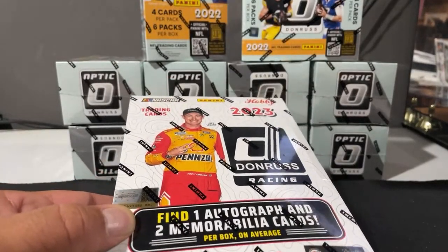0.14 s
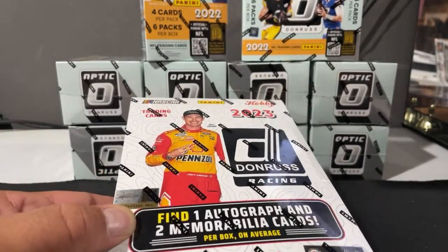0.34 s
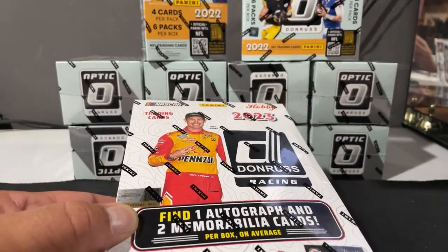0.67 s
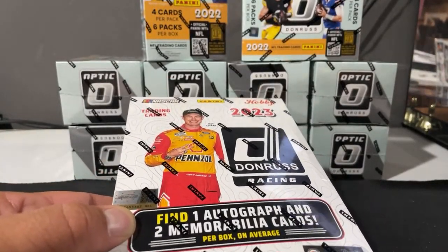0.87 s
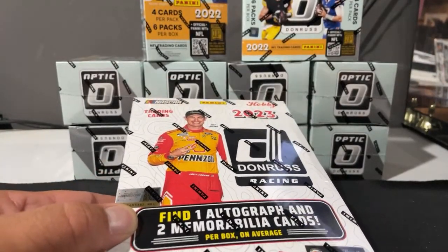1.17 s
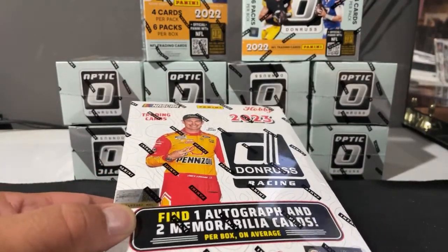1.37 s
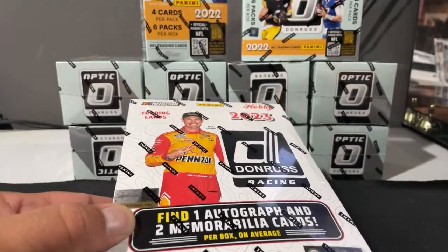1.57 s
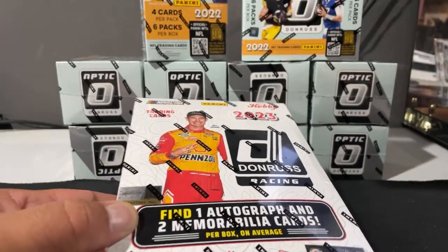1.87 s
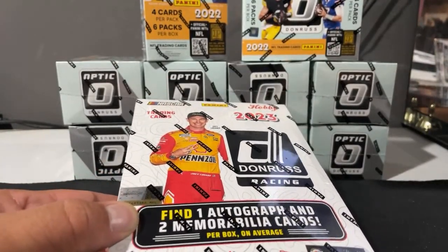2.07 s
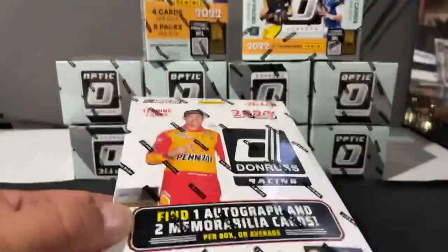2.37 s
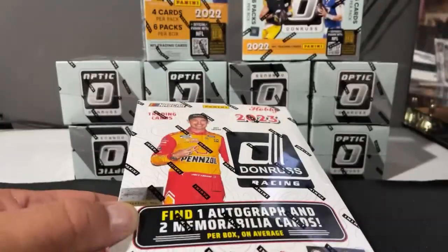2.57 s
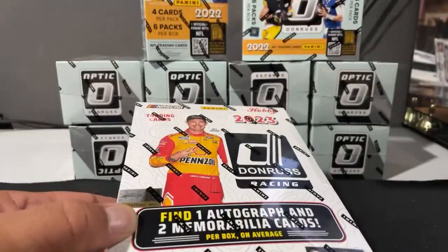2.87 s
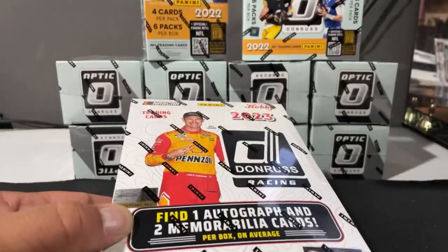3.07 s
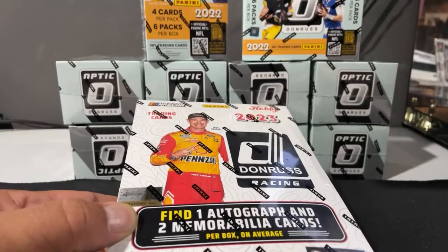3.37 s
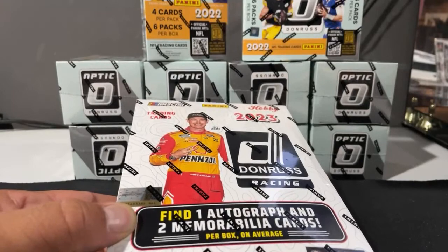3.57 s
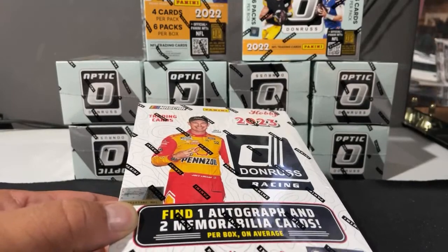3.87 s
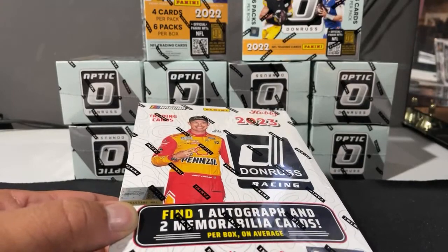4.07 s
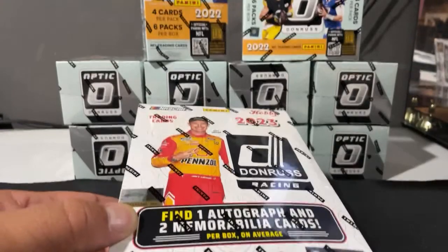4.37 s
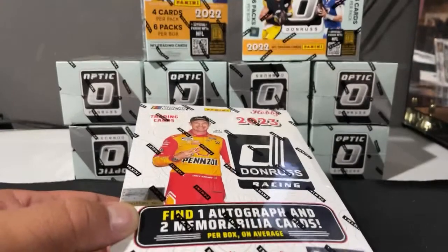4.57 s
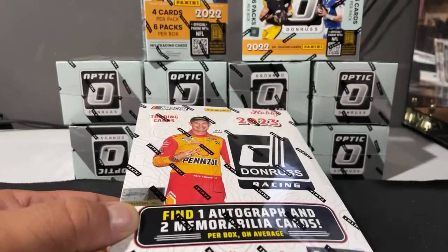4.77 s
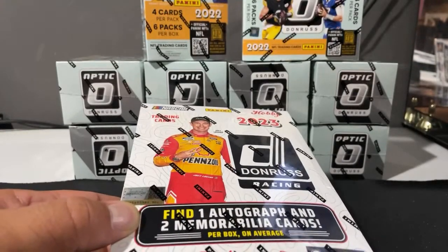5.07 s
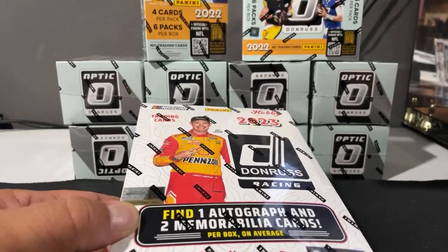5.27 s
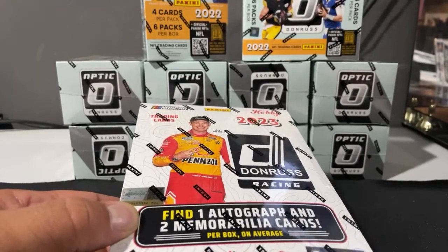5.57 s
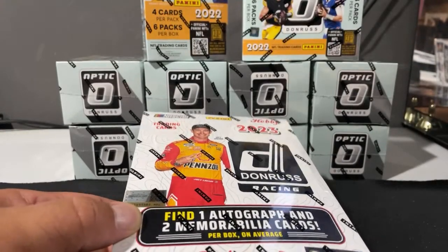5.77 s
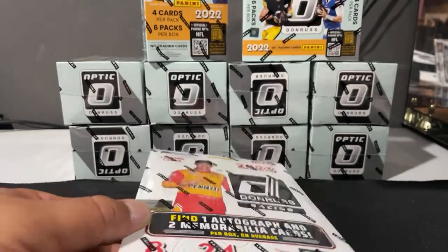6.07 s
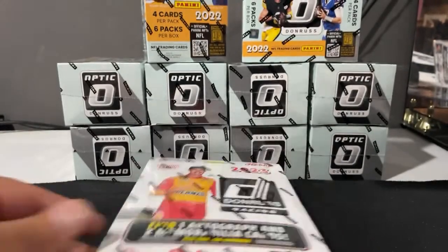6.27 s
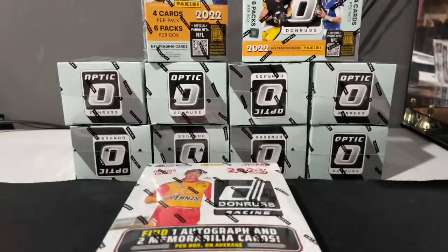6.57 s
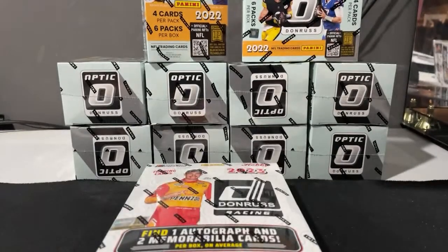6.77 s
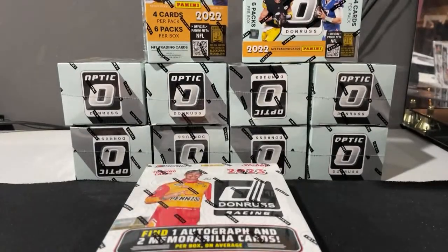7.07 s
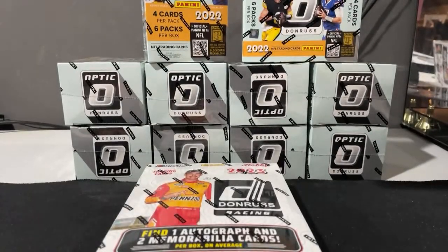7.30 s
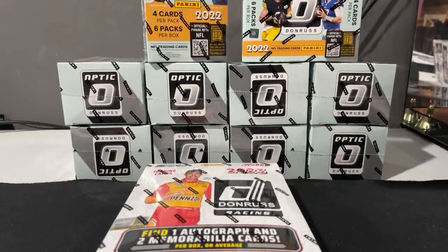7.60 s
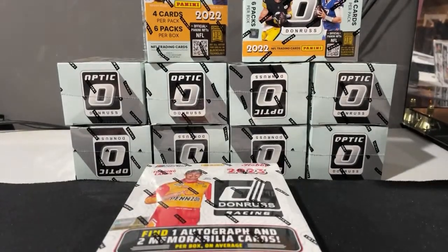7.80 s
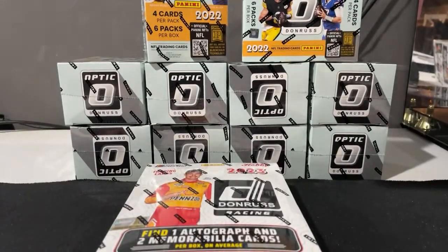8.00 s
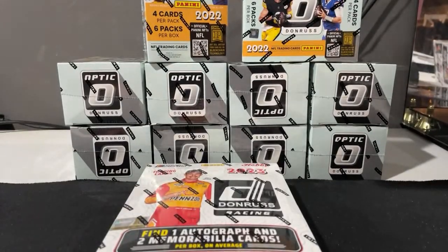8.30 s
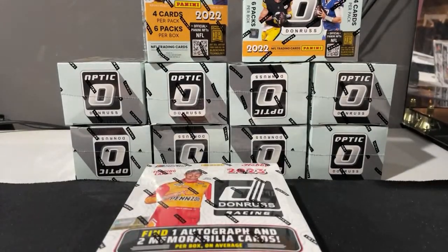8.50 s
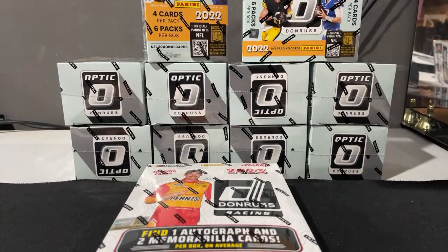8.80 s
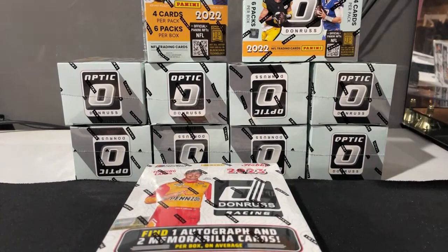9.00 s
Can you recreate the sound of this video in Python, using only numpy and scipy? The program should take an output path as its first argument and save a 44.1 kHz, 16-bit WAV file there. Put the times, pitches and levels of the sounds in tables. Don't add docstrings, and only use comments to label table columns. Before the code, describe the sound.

Close to a phone in a small, quiet room, fingers tap and scuff lightly around a box. A very loud, sharp slap hits the desk at about two seconds, followed by rubbing and softer bumps. A strong double thump comes just after four seconds, a medium one near five and a half, then weaker knocks and sparse handling to the end.

```python
import sys
import numpy as np
from scipy import signal
from scipy.fft import rfft, irfft, next_fast_len
from scipy.io import wavfile
from scipy.ndimage import uniform_filter1d

SR = 44100
rng = np.random.default_rng(int(sys.argv[2]) if len(sys.argv) > 2 else 0)


def generate_wav(signal):
    frames = np.transpose(np.atleast_2d(signal))
    scaled = np.clip(frames, -1, 1) * 32767
    pcm = np.round(scaled).astype(np.int16)
    wavfile.write(sys.argv[1], SR, pcm)


def voltage_ratio(decibels):
    exponent = np.asarray(decibels, float) / 20
    return 10 ** exponent


N = 403382

# start in seconds, peak in dB, loudest mode in Hz,
# ring t60 in seconds, hardness in dB per octave.
SLAP_BLOWS = [(1.667, -20, 183.4, 0.16, -3.5), (2.273, 0.5, 142, 0.14, 0.5), (2.371, -14, 490, 0.055, 2.5),
              (3.011, -22, 191, 0.17, -8), (3.11, -19.5, 195.8, 0.3, -0.5), (3.169, -18, 167, 0.19, -1),
              (4.206, -5, 341.3, 0.032, -2), (4.218, -3.5, 157.8, 0.12, -2.5), (4.412, -5, 139, 0.16, -0.5),
              (5.377, -12, 294.7, 0.11, -3.5), (5.396, -9.5, 436, 0.051, -2),
              (5.424, -15.5, 124.3, 0.17, 0.5), (6.075, -25, 149, 0.19, -5.5),
              (6.361, -16.5, 285, 0.05, -1), (6.368, -14, 76.3, 0.1, -4.5),
              (7.634, -23.5, 317, 0.079, -1.5), (7.931, -17, 232.6, 0.084, -4.5),
              (7.974, -23.5, 144.6, 0.18, 2.5)]
# start in seconds, peak in dB,
# loudest mode in Hz, hardness in dB per octave.
NUDGES = [(0.067, -44, 386, 11), (.489, -38.5, 245, 11), (1.051, -31, 110, -3), (1.074, -29, 99, 4.5),
          (1.78, -34, 286, 3.5), (2.657, -32, 350, -0.5), (2.757, -24.5, 156.6, 3.5),
          (2.823, -27.5, 191, 4), (3.082, -25.5, 189, 4), (3.214, -21, 147, -2.5), (3.488, -28, 139, 4.5),
          (3.522, -20.5, 156.5, 4), (3.756, -32, 189.7, -1), (4.29, -15.5, 188, 5), (4.803, -36.5, 151, 1),
          (4.861, -29, 111.6, 3.5), (5.168, -36, 140, 4.5), (5.715, -37, 152, -1.5), (6.153, -35, 140, 2),
          (7.269, -32, 141.7, 3.5), (7.428, -30.5, 273, 2), (7.655, -27, 186.3, 0), (7.832, -34, 292, -4.5),
          (8.47, -36.5, 245, -3), (8.561, -30, 245, -1)]
SLAP_CONTACT_S, NUDGE_CONTACT_S, NUDGE_T60_S = 0.0092, 0.014, 0.0784
# frequency in Hz, level in dB, share of the ring time.
BOARD_MODES = [(67.1, -9, 2.3), (112, -6.5, 1.6), (150.5, 6, 0.42), (191, -7.5, 1), (245, -4.5, 0.65),
               (288.8, -1, 1), (354, 0.5, 0.45), (477.5, -2.5, 0.52), (574, -12, 0.48), (773, -10.5, 0.52)]
BOOM_T60_S, BOOM_DB = 0.24, -15

# start in seconds, peak in dB, knock in Hz,
# crack over knock in dB, clatter t60 in seconds.
KNOCKS = [(1.035, -29.5, 500, -13, 0.14), (2.096, -33, 782, -10.5, 0.083), (2.256, -32, 3090, 0.5, 0.05),
          (2.272, -2.5, 765, -0.5, 0.089), (2.335, -22.5, 1190, 0.5, 0.019),
          (2.371, -12, 475.4, -13, 0.034), (2.518, -33.5, 2250, -1, 0.13), (2.754, -34, 1670, -3, 0.13),
          (3.007, -27.5, 473, -6.5, 0.043), (3.098, -18, 1500, -19, 0.06), (3.337, -27.5, 1930, -6, 0.16),
          (3.757, -39, 715, -32, 0.069), (4.204, -8.5, 583, -7.5, 0.029), (4.213, -11.5, 402, -9.5, 0.089),
          (4.236, -21.5, 490, 2, 0.019), (4.401, -30, 452, -9, 0.1), (4.413, -9, 492, -8, 0.047),
          (5.374, -12, 474, -6.5, 0.063), (5.4, -11.5, 452, -4.5, 0.03), (6.073, -28, 410, -11, 0.13),
          (6.362, -19.5, 593, -13, 0.086), (7.643, -28.5, 550, -13.5, 0.12), (7.93, -19.5, 972, -10, 0.12),
          (7.976, -29.5, 960, -21, 0.13)]
# start in seconds, peak in dB, knock in Hz, crack over knock in dB.
TAPS = [(0.491, -42, 540, -25), (0.71, -33, 460, -10), (4.436, -22, 1504, -8), (1.138, -43, 2090, -2.5),
        (1.217, -41, 1100, -5.5), (1.658, -32, 470, -14.5), (1.833, -42, 990, -2.5), (1.889, -39, 1420, -5),
        (2.185, -45, 1310, -3.5), (2.823, -32.5, 1090, -9), (2.889, -28.5, 1094, -28),
        (3.199, -34.5, 1740, -25), (3.279, -34.5, 720, -30), (3.58, -34.5, 617, -12),
        (3.684, -39, 1450, -31), (4.155, -46.5, 1440, -2.5), (4.659, -50, 1725, -2.5),
        (4.848, -42.5, 490, -2), (5.55, -43, 1750, -12), (5.576, -44.5, 1730, -3), (5.683, -47, 1770, -7.5),
        (5.756, -46, 1272, -14.5), (5.889, -62, 4520, 8), (6.339, -43, 1110, -7), (6.82, -34, 420, -22.5),
        (7.428, -39, 980, -22.5), (7.529, -45, 414, -17), (7.834, -33.5, 507, -31),
        (8.05, -39.5, 1350, -6.5), (8.584, -32, 303, -29)]
TAP_T60_S = 0.071
# frequency in Hz, level in dB per Hz.
KNOCK_COLOUR = [(210, -30), (350, 7), (474, -5.5), (1500, -9.5), (2100, -19), (3400, -25), (11000, -38.5),
                (16000, -41)]

# start in seconds, level in dB, t60 in seconds.
CHINKS = [
    (1.676, -66, .25),
    (1.9, -69, .12),
    (1.995, -63, .15),
    (2.075, -69, .1),
    (2.57, -66, .15),
    (2.637, -63, .16),
    (2.767, -63, .14),
]
# frequency in Hz, level in dB.
METAL_MODES = [(13120, 0), (15560, -10), (8600, -15)]

# start in seconds, length in seconds, centre in Hz, width in Hz, peak in dB.
RESONANT_BURSTS = [(3.105, 0.17, 190, 23, -20.5), (6.362, .034, 117, 47, -7), (3.079, 0.17, 445, 120, -31),
                   (4.235, 0.17, 380, 260, -24.5), (0.46, 0.077, 4040, 500, -57), (3.092, 0.024, 7000, 1500, -41),
                   (3.132, .02, 7000, 1000, -48), (3.18, 0.075, 3800, 700, -48), (3.175, .025, 7200, 1200, -44.5),
                   (3.176, .03, 3000, 500, -41), (3.219, 0.028, 7000, 1400, -50), (2.9, 0.025, 2800, 500, -47),
                   (3.218, 0.025, 1690, 400, -40), (3.333, 0.062, 2350, 650, -34.5),
                   (3.387, 0.11, 2600, 970, -46.5), (1.125, 0.07, 125, 30, -39), (3.661, .02, 1300, 900, -47),
                   (4.184, 0.018, 2220, 2000, -42), (4.204, .007, 3330, 600, -19), (4.258, 0.1, 3300, 400, -47),
                   (4.351, 0.1, 2900, 500, -46), (4.407, 0.022, 6900, 760, -31), (4.408, 0.063, 2750, 440, -22.5),
                   (4.535, .07, 14100, 300, -59.5), (4.581, 0.037, 4950, 5400, -50), (4.65, 0.12, 8240, 504, -60.5),
                   (4.66, 0.096, 4730, 600, -60), (4.655, 0.11, 14960, 1507, -60.5),
                   (4.212, 0.004, 3800, 7000, -21.5), (4.9, .04, 4470, 496, -52.5), (5.577, .03, 8600, 2000, -56),
                   (5.572, .03, 5630, 500, -59.5), (8.582, 0.013, 1015, 500, -46), (5.66, 0.035, 5900, 502, -56.5),
                   (5.747, 0.078, 4350, 250, -57.5), (5.75, 0.033, 6940, 3030, -53),
                   (5.842, 0.0033, 5000, 7000, -56), (5.889, 0.03, 10400, 4300, -50),
                   (6.362, 0.0065, 6300, 3500, -32), (6.373, 0.011, 1130, 900, -24),
                   (6.374, 0.017, 2770, 1800, -31), (6.375, 0.0055, 5900, 4000, -35), (6.4, 0.017, 3650, 300, -53),
            (7.593, 0.085, 2210, 1100, -48.5), (7.601, 0.039, 4460, 500, -54.5),
            (7.637, 0.037, 5000, 5000, -51), (7.829, 0.046, 3000, 3000, -60.5),
            (7.876, 0.051, 4000, 4500, -41), (7.93, .025, 10100, 1500, -37), (7.93, .03, 14800, 1800, -48),
            (7.975, .02, 5400, 600, -52), (8.046, 0.09, 3780, 3000, -49.5), (8.112, 0.022, 3500, 400, -62),
            (4.416, 0.045, 498, 50, -17.5), (2.276, .045, 345, 59.73, -10.5),
            (8.479, 0.13, 3570, 796, -63.5), (8.524, 0.1, 1695, 1200, -51.5),
                   (0.773, .03, 5220, 1000, -38), (0.777, 0.03, 3440, 760, -36.5), (0.896, 0.0051, 3560, 4500, -37.5),
         (0.957, .012, 4970, 4000, -49), (1.039, 0.12, 251.3, 210, -37), (1.195, .008, 2250, 2900, -46),
         (1.585, .008, 3980, 6000, -52), (1.656, 0.017, 375, 240, -28), (1.7, 0.11, 167.7, 41, -32),
         (2.02, 0.03, 1220, 1800, -44), (2.106, .04, 3040, 3200, -49), (2.27, 0.0041, 3604, 3000, -9.5),
         (2.278, 0.0067, 3510, 1700, -9), (2.369, 0.0042, 4620, 9200, -22.5),
         (3.099, 0.016, 1448, 400, -19.5), (3.68, 0.019, 1490, 370, -35.5), (3.708, .03, 12100, 6000, -48),
         (3.754, .03, 1300, 1300, -51), (3.835, 0.056, 1403, 1280, -49), (3.883, 0.05, 3280, 1300, -52),
         (4.035, 0.032, 5460, 2000, -48.5), (4.156, .015, 6270, 440, -54.5),
         (5.396, 0.011, 4230, 500, -22.5), (5.4, 0.024, 434, 180, -11), (6.081, 0.0072, 4500, 6000, -39),
         (6.093, .005, 3450, 4000, -43), (6.113, .005, 4570, 2700, -37), (6.862, .012, 8000, 12300, -52),
         (8.289, 0.17, 1199, 1400, -60), (8.823, 0.15, 1505, 1200, -54), (4.428, 0.15, 79.7, 18, -17.5),
         (2.33, 0.16, 75, 22, -24), (4.25, 0.28, 190.6, 90, -21.5)]
RATTLE_RISE_S, RATTLE_FALL = 0.0022, 0.5

# start in seconds, length in seconds, skin in dB, hiss in dB,
# hollow under the hand in Hz.
DRAGS = [(0.673, 0.17, -39, -58.5, 483), (0.918, 0.064, -35, -64, 1147), (1.125, 0.11, -42, -66, 1056),
         (2.076, 0.074, -40.5, -55, 825), (2.508, 0.013, -22.5, -48, 2180), (2.745, 0.11, -34, -52.5, 1517),
         (2.839, 0.037, -30, -43.5, 1650), (2.885, 0.1, -40, -51, 1084), (2.988, 0.021, -33.5, -66, 505),
         (3.177, 0.046, -32, -55, 1767), (3.328, 0.048, -27, -46.5, 1970), (3.387, 0.12, -40, -77, 1110),
         (3.504, 0.024, -39, -79, 670), (3.57, 0.045, -40, -80, 720), (3.955, 0.095, -38.5, -83, 992),
         (4.023, 0.041, -37, -54, 1320), (4.807, 0.037, -41, -66.5, 1690), (8.121, 0.033, -44, -72.5, 570),
         (5.754, 0.034, -45, -68, 1310), (6.071, 0.066, -34, -67, 1175), (7.418, 0.068, -43, -64, 1610),
         (7.834, .04, -45.5, -72.5, 507), (7.92, 0.091, -30, -49, 980), (8.468, 0.15, -51.5, -78, 790)]
# start in seconds, length in seconds, skin in dB, hiss in dB,
# hollow in Hz.
SCUFFS = [(0.757, 0.028, -39, -44, 3020), (2.335, 0.051, -25, -36.5, 3020),
          (2.537, 0.018, -31, -42.5, 2890), (3.072, 0.1, -42, -46, 1340), (4.214, 0.048, -19.5, -38, 2890),
          (4.399, 0.058, -18.5, -31.5, 1516), (4.644, 0.079, -60.5, -66.5, 1733),
          (4.887, 0.051, -45, -50.5, 1790), (5.142, 0.15, -39.5, -50, 1785), (5.387, 0.012, -51, -21, 1240),
          (5.569, 0.016, -45.5, -48, 1800), (6.115, 0.12, -49, -49, 2170), (6.594, 0.17, -43, -48, 1290),
          (7.208, 0.11, -60.5, -65.5, 1400), (7.615, 0.049, -44.5, -58, 2170),
          (7.866, 0.043, -31, -62, 1325), (8.039, 0.062, -42, -71, 1400)]
DRAG_FIBRE_HZ, SCUFF_FIBRE_HZ = 8030, 3450
# frequency in Hz, level in dB per Hz.
CLOTH_COLOUR = [(180, -24), (400, 3.5), (749, -3.5), (1230, -2.5), (2480, -13.5), (7690, -24), (12500, -24),
                (16000, -26)]

# start in seconds, length in seconds, first pitch in Hz,
# last pitch in Hz, width in Hz, level in dB.
SQUEAKS = [
    (0.02, 0.45, 1100, 1150, 270, -62),
    (3.376, 0.11, 1085, 1075, 60, -52),
    (6.5, 0.03, 1480, 1620, 30, -57),
    (6.622, 0.072, 2430, 2540, 60, -48),
    (3.975, 0.083, 290, 270, 52, -43.5),
]

# start in seconds, length in seconds, skin on wood in dB,
# cloth hiss in dB.
SPELLS = [(0.33, 0.063, -77, -71), (0.398, 0.79, -62, -64), (1.237, 1, -63, -67.5),
          (2.251, 0.4, -53.5, -61), (2.742, 0.68, -57, -59.5), (3.448, 0.23, -64, -68),
          (3.667, 0.3, -75, -68), (3.974, 0.31, -71.5, -75), (4.196, 0.29, -48, -63.5),
          (4.412, 0.13, -47.5, -46.5), (4.828, 0.083, -64, -67), (5.127, 0.2, -62.5, -66),
          (5.392, 0.12, -56, -54), (5.572, 0.24, -70, -72), (5.83, 0.34, -84, -67), (6.06, 0.79, -66, -58),
          (6.606, 0.08, -81, -45.5), (6.846, 0.53, -71, -80.5), (7.188, 0.089, -60, -70),
          (7.43, 0.35, -62.5, -70.5), (7.836, 0.23, -66.5, -75), (8.215, 0.36, -77, -88.5),
          (8.816, 0.51, -93, -70), (8.925, 0.21, -99.5, -67)]
SPELL_RISE_S, SPELL_FALL_S = 0.017, 0.04
STILL_RUMBLE_DB, STILL_SKIN_DB, STILL_CLOTH_DB = -60, -74, -83.5
LEAN_DB, SHAKE_DB, SHAKE_T60_S = 8, -17.5, 0.46
# frequency in Hz, level in dB per Hz.
RUMBLE_COLOUR = [(25, -37), (48, -38), (65, 0), (156, -1), (394, -12.5), (500, -26.5), (650, -62.5),
                 (1100, -120)]

# start in seconds, length in seconds, level in dB.
SWISHES = [
    (3.674, 0.22, -59),
    (6.11, 0.55, -58.5),
    (7.934, 0.054, -60),
]
PATCHY_DB = 2.1

ROOM_T60_S, ROOM_DB, ROOM_HZ = 0.2, -17, 5058
HUSH_DB, HUSH_DEPTH = -112, .55
TOP_HZ = 15850


def shaped(x, table, lo_hz=20., hi_hz=18930.0):
    n = next_fast_len(len(x))
    hz = np.fft.rfftfreq(n, 1 / SR) + 1
    table_hz, table_db = np.transpose(table)
    gain = voltage_ratio(np.interp(np.log(hz), np.log(table_hz), table_db))
    edges = 1 / np.sqrt((1 + (lo_hz / hz) ** 6) * (1 + (hz / hi_hz) ** 6))
    return irfft(rfft(x, n) * gain * edges, n)[:len(x)]


def unit(x):
    return x / np.sqrt(np.mean(x ** 2))


def decay(t, t60):
    return np.exp(-np.log(1000) * t / t60)


def ring(t, hz, t60):
    return np.sin(2 * np.pi * hz * t) * decay(t, t60)


def add(out, s, x, db):
    i = int(s * SR)
    out[i:i + len(x)] += (voltage_ratio(db) * x / np.max(np.abs(x)))[:N - i]


def grainy(rate, spread_db):
    k = int(SR / rate)
    grain_db = spread_db * np.minimum(rng.exponential(size=N // 20 + 1), 2.5)
    size = voltage_ratio(grain_db)[np.arange(N) // k]
    return rng.standard_normal(N) * uniform_filter1d(size, k)


def spell(s, length):
    now = np.arange(N) / SR
    return (1 + np.tanh((now - s) / SPELL_RISE_S)) * (1 - np.tanh((now - s - length) / SPELL_FALL_S)) / 4


def thumps():
    out = np.zeros(N)
    t = np.arange(0, SR // 2, 8) / SR
    blows = [row + (SLAP_CONTACT_S,) for row in SLAP_BLOWS]
    blows += [(s, db, hz, NUDGE_T60_S, hard_db, NUDGE_CONTACT_S) for s, db, hz, hard_db in NUDGES]
    chance = rng.standard_normal((len(blows), 4, 11))
    for (s, db, hz, t60, hard_db, contact), g in zip(blows, chance):
        body = 0
        for k, (f, mode_db, share) in enumerate(BOARD_MODES + [(hz, 4, .9)]):
            octaves = np.log2(f / hz)
            size = voltage_ratio(mode_db + 0.91 * g[0, k] - 4.4 * abs(octaves) + hard_db * octaves)
            rise = (1 - np.exp(-t / (contact * (150 / f) ** 0.16))) ** 2
            phase = 2 * np.pi * f * (1 + .015 * g[1, k]) * t + 3 * g[2, k]
            top = decay(t, t60 * share) * np.sin(phase)
            frame = decay(t, BOOM_T60_S * (150 / f) ** 0.62) * np.sin(phase * (1 + 0.056 * g[3, k]))
            body = body + size * rise * (top + voltage_ratio(BOOM_DB) * frame)
        add(out, s - .003, signal.resample_poly(body, up=8, down=1), db)
    return out


def knocks():
    out, t = np.zeros(N), np.arange(SR // 4) / SR
    broad = unit(shaped(grainy(700, 3.9), KNOCK_COLOUR, lo_hz=365.0, hi_hz=3080.0))
    crack = unit(shaped(grainy(700, 3), KNOCK_COLOUR, lo_hz=2700., hi_hz=17000.))
    for s, db, hz, crack_db, t60 in KNOCKS + [row + (TAP_T60_S,) for row in TAPS]:
        i = min(int(s * SR), N - len(t))
        t60 = min(t60, .12)
        clatter = (1 - np.exp(-t / 0.0034)) * decay(t, t60)
        pair = ring(t, hz, min(.7 * t60, .04)) + .7 * ring(t, .885 * hz, min(.6 * t60, .04))
        pitched = (1 - np.exp(-t / .002)) * pair
        dull = (600 / max(hz, 600)) ** 0.29 * unit(broad[i:i + len(t)] * clatter)
        add(out, s - .001, dull + .9 * unit(pitched), db)
        bright = crack[i:i + len(t)]
        patch = sum(ring(t[:512], f, 0.0043) for f in 2600 * 3 ** rng.random(size=3))
        bright = bright + 0.51 * unit(signal.fftconvolve(bright, patch)[:len(t)])
        add(out, s - .001, bright * clatter ** 0.92, db + crack_db)
    return out


def chinks():
    shake, t = np.zeros(N), np.arange(SR // 4) / SR
    for s, db, t60 in CHINKS:
        add(shake, s, (1 - np.exp(-t / 0.011)) * decay(t, t60), db)
    modes = sum(voltage_ratio(db) * ring(t[:2048], hz, 0.024) for hz, db in METAL_MODES)
    return signal.fftconvolve(shake * grainy(110, 6.8), modes / np.sqrt(np.sum(modes ** 2)))[:N]


def rattles():
    out, rows = np.zeros(N), RESONANT_BURSTS
    for (s, length, hz, width_hz, db), z in zip(rows, rng.standard_normal((len(rows), 2, SR // 4))):
        t = np.arange(int(min(length, .24) * SR)) / SR
        k = int(SR / width_hz / 1.5) + 1
        a, b = uniform_filter1d(uniform_filter1d(z, k), k)[:, :len(t)]
        buzz = a * np.cos(2 * np.pi * hz * t) + b * np.sin(2 * np.pi * hz * t)
        add(out, s, buzz * (1 - np.exp(-t / RATTLE_RISE_S)) * (1 - t / t[-1]) ** RATTLE_FALL, db)
    return out


def scuffs():
    out, t = np.zeros(N + SR), np.arange(SR // 2) / SR
    skin = unit(shaped(grainy(250, 0.65), CLOTH_COLOUR, lo_hz=411.0, hi_hz=2310.0))
    hiss = unit(shaped(grainy(300, 3.8), CLOTH_COLOUR, lo_hz=2070.0))
    rows = [row + (DRAG_FIBRE_HZ,) for row in DRAGS] + [row + (SCUFF_FIBRE_HZ,) for row in SCUFFS]
    for s, length, skin_db, hiss_db, hollow_hz, fibre_hz in rows:
        i = int(s * SR)
        j = min(i, N - len(t))
        low, high = skin[j:j + len(t)], hiss[j:j + len(t)]
        start = 1 - np.exp(-t / (0.0041 + 0.033 * length))
        hold = start / (1 + np.exp((t - length) / (0.0092 + 0.058 * length)))
        hollow = unit(signal.fftconvolve(low + .5 * high, ring(t[:1024], hollow_hz, 0.11))[:len(t)])
        fibre = unit(signal.fftconvolve(high, ring(t[:1024], fibre_hz, 0.013))[:len(t)])
        dull = voltage_ratio(skin_db - 10.5) * (low + 0.42 * hollow)
        bright = voltage_ratio(hiss_db) * (high + 0.022 * fibre)
        out[i:i + len(t)] += hold * (dull + bright)
    return out[:N]


def squeaks():
    out = np.zeros(N)
    chance = rng.standard_normal((len(SQUEAKS), SR // 2))
    for (s, length, hz0, hz1, width_hz, db), z in zip(SQUEAKS, chance):
        n = int(length * SR)
        stutter = uniform_filter1d(z, int(SR / width_hz))[:n]
        tone = np.sin(2 * np.pi * np.cumsum(np.linspace(hz0, hz1, n)) / SR)
        add(out, s, tone * stutter * np.hanning(n) ** 0.034, db + 10.5)
    return out


def rubbing(thuds):
    mid, high = voltage_ratio(STILL_SKIN_DB), voltage_ratio(STILL_CLOTH_DB)
    for s, length, skin_db, cloth_db in SPELLS:
        on = spell(s, length)
        mid = mid + voltage_ratio(skin_db) * on
        high = high + voltage_ratio(cloth_db) * on
    keep = np.exp(-2 * np.log(1000) / (SHAKE_T60_S * SR))
    shudder = np.sqrt(signal.lfilter([1 - keep], [1, -keep], thuds ** 2))
    low = voltage_ratio(STILL_RUMBLE_DB) + voltage_ratio(LEAN_DB) * mid + voltage_ratio(SHAKE_DB) * shudder
    t = np.arange(4096) / SR
    board = sum(voltage_ratio(db) * ring(t, f, 0.074 * share) for f, db, share in BOARD_MODES)
    noise = grainy(60, 1.3)
    rumble = unit(shaped(noise, RUMBLE_COLOUR, hi_hz=350.0))
    rumble = rumble + 0.022 * unit(signal.fftconvolve(noise, board)[:N])
    skin = shaped(grainy(170, 1.2), CLOTH_COLOUR, lo_hz=350., hi_hz=2028.0)
    cloth = shaped(grainy(190, 0.66), CLOTH_COLOUR, lo_hz=2330.0)
    return low * unit(rumble) + mid * unit(skin) + high * unit(cloth)


def swishes():
    air = signal.sosfilt(signal.butter(2, 5000., "highpass", fs=SR, output="sos"), rng.standard_normal(N))
    return unit(air) * sum(voltage_ratio(db) * spell(s, length) for s, length, db in SWISHES)


def patchy(x):
    hz, _, z = signal.stft(x, SR, nperseg=512)
    folds = rng.standard_normal(z.shape)
    for frames, bins in [(9, 11), (5, 7)]:
        folds = uniform_filter1d(uniform_filter1d(folds, size=frames, axis=1), size=bins, axis=0)
    gain = voltage_ratio(PATCHY_DB * unit(folds) * (hz[:, None] > 500))
    return signal.istft(z * gain, SR, nperseg=512)[1][:N]


def tail(x, t60, lo_hz, hi_hz):
    t = np.arange(SR) / SR
    h = rng.standard_normal(SR) * (1 - np.exp(-t / 0.0054)) * decay(t, t60)
    h = signal.sosfilt(signal.butter(2, [lo_hz, hi_hz], "bandpass", fs=SR, output="sos"), h)
    return signal.fftconvolve(x, h / np.sqrt(np.sum(h ** 2)))[:N]


def scene():
    thuds = thumps()
    blows = thuds + knocks() + chinks()
    room = voltage_ratio(ROOM_DB) * tail(blows, ROOM_T60_S, 290.0, ROOM_HZ)
    friction = patchy(rubbing(thuds) + swishes()) + scuffs() + squeaks()
    return (blows + room + friction + rattles())[None]


def hush(x):
    hz, _, z = signal.stft(x, SR, nperseg=512)
    power = uniform_filter1d(uniform_filter1d(np.abs(z) ** 2, size=5, axis=-1), size=7, axis=-2)
    share = HUSH_DEPTH * (hz[:, None] > 1500)
    gain = 1 - share / (1 + (power / voltage_ratio(2 * HUSH_DB)) ** 2)
    return signal.istft(z * gain, SR, nperseg=512)[1][..., :N]


def roll_off(x):
    return signal.sosfilt(signal.butter(12, 17000, fs=SR, output="sos"), x)


def record(dry):
    x = signal.sosfilt(signal.butter(5, 58, "highpass", fs=SR, output="sos"), hush(dry))
    x = x + .5 * signal.lfilter(*signal.iirpeak(8250, 14, fs=SR), x)
    port = 0.19 * signal.lfilter(*signal.iirpeak(3500, 6, fs=SR), x)
    dip = 0.69 * signal.lfilter(*signal.iirpeak(13000, 4, fs=SR), x)
    x = np.tanh(.95 * (x + port - dip)) / .95
    x = signal.sosfilt(signal.ellip(10, .3, 70, TOP_HZ, fs=SR, output="sos"), x)
    return roll_off(x)


dry = scene()
out = record(dry)
generate_wav(out)
```